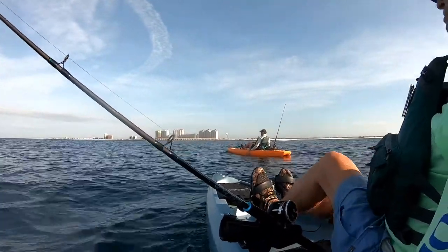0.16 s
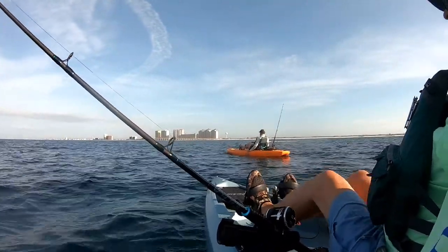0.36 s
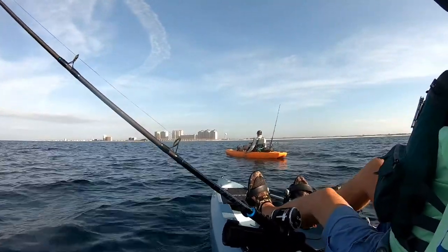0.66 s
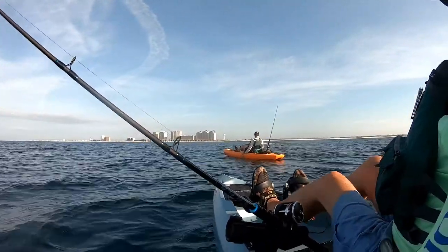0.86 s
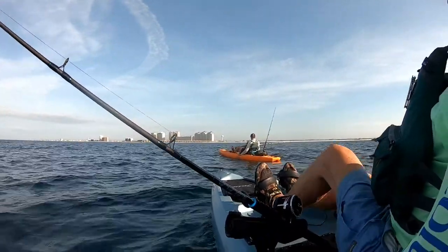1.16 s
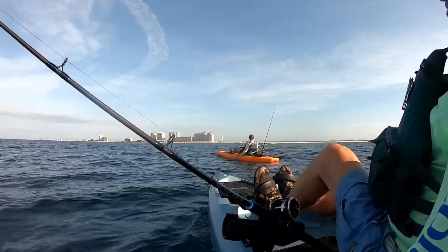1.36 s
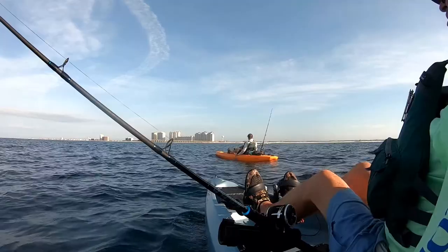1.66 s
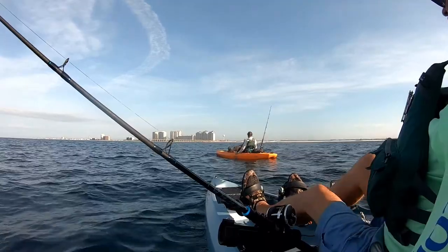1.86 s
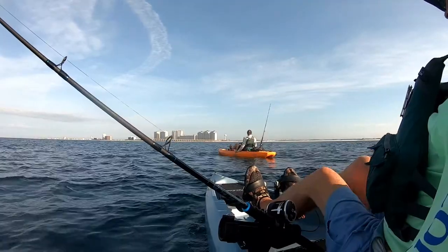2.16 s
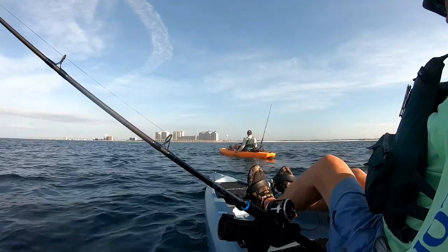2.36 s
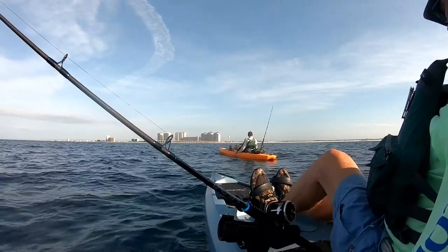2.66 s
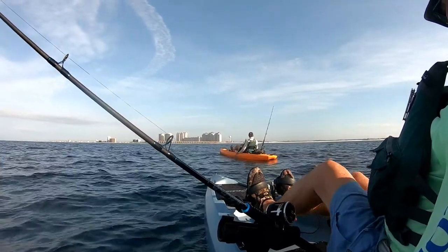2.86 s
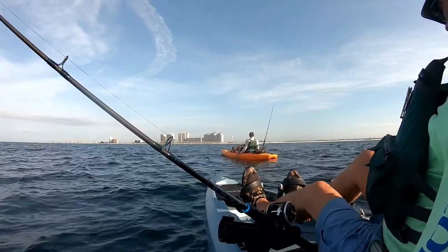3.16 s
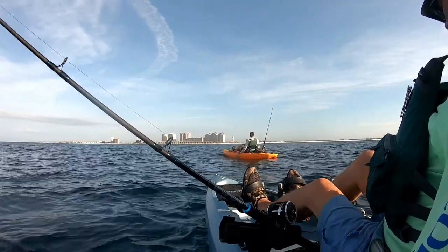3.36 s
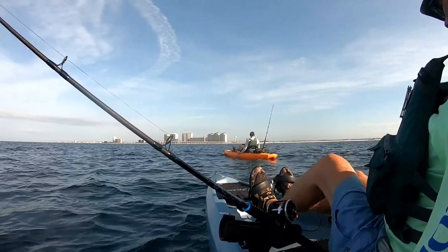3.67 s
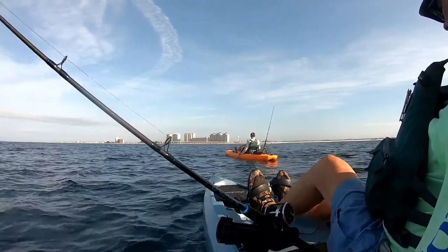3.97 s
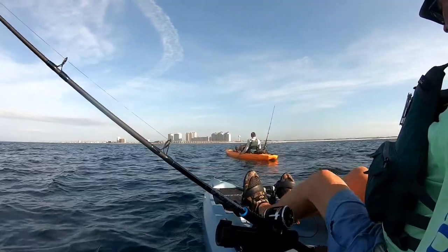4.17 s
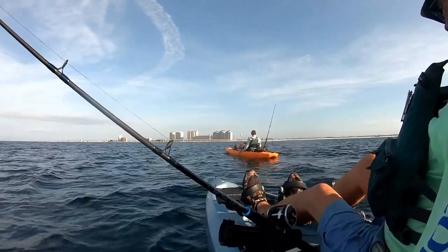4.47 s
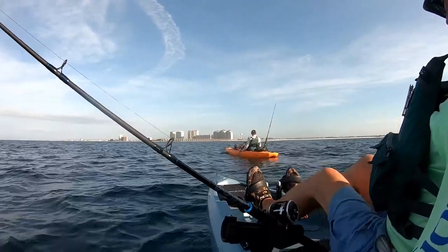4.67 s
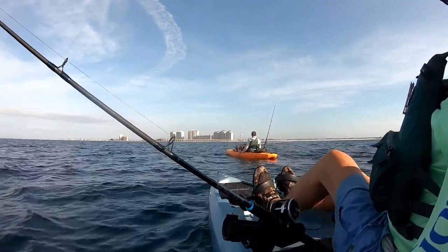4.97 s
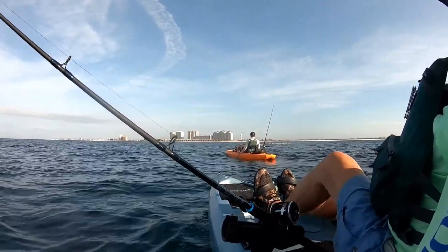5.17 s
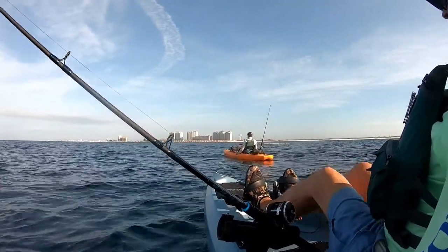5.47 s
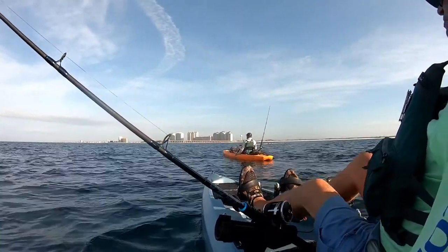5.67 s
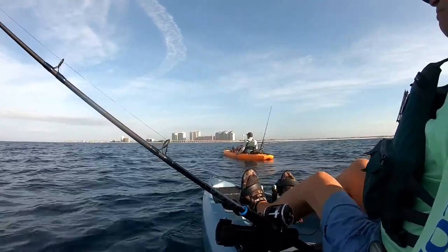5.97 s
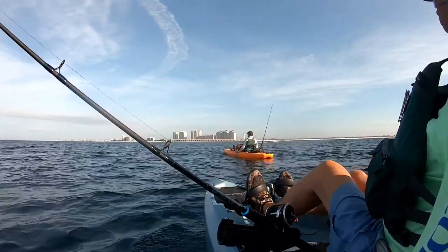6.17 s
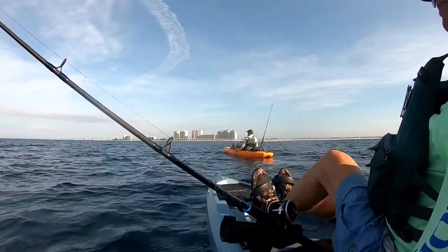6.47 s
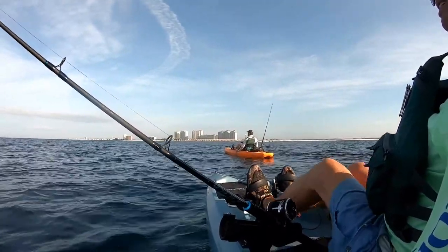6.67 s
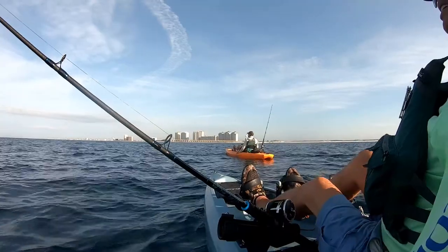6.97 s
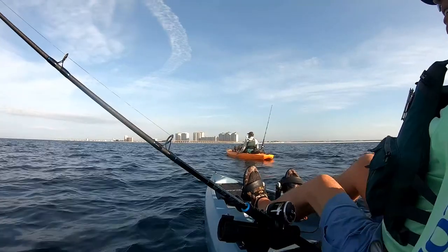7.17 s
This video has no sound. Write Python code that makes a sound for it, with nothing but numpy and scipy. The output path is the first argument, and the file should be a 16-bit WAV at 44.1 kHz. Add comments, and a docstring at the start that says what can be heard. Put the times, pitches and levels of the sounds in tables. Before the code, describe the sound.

Light chop washes along a plastic kayak on open water, heard close up from on board. A low hull drone, a breeze on the microphone and the faint, wavering hum of distant boat motors run throughout. It opens with a soft surge and a hiss of foam. Deep, loud wind thumps hit the microphone just before 1 second and again at 1.6, with a short gust near 1.9. From about 1 second, bubbles plop and water gurgles in uneven clusters. A wavelet gives a strong hollow slap on the hull at about 1.8 seconds. More knocks follow between 3.3 and 3.7, with light splashing and fizz, then at 4.1 and 4.9. Bubbly wash is busy from 4.5 to 5.3 seconds. After that come gentler surges and plops around 6.1 and 6.9, while the distant motor hum grows slightly towards the end, just past 7 seconds.

```python
"""A plastic kayak pedalled over a light chop. From the start, wind buffets the microphone over the drone
of the hull, far boat motors and open water; wash surges along the side, throwing spray, and foam hisses
away. Just before one second, single bubbles begin to plop at their resonances and a few eddies thump on
the microphone ports. From about one second to five, wavelets slap the hull, ringing its modes and the
air pockets they trap. Surges, foam and plops go on to the end, where more motor tones come in."""
import sys
import numpy as np
from scipy import signal
from scipy.fft import rfft, irfft
from scipy.io import wavfile

SR = 44100
rng = np.random.default_rng(int(sys.argv[2]) if len(sys.argv) > 2 else 0)


def bounce(signal):
    """Save signal as a 16-bit WAV file at the path given by the first command-line argument."""
    frames = np.transpose(np.atleast_2d(signal))
    limited = np.clip(frames, -1, 1)
    pcm = np.round(limited * 32767).astype(np.int16)
    wavfile.write(sys.argv[1], SR, pcm)


N = 323385
TIME_S = np.arange(N) / SR
BIN_HZ = np.arange(1, N // 2 + 2) * SR / N   # one bin up, so the logarithm is finite


def from_db(db):
    """The decibel law: amplitude grows tenfold every 20 dB."""
    return 10 ** (np.asarray(db) / 20)


def unit_rms(x):
    """Normalisation to unit mean power."""
    return x / np.sqrt(np.mean(x ** 2) + 1e-20)


def per_bin(curve):
    """Interpolation of a curve to every bin along a log-frequency axis."""
    hz, values = np.transpose(curve)
    return np.interp(np.log(BIN_HZ), np.log(hz + 1), values)


def drift(rate_hz):
    """Slow random modulation: low-passed noise of unit rms."""
    step = 40
    pole = np.exp(-2 * np.pi * step * rate_hz / SR)
    slow = signal.lfilter([1], [1, -2 * pole, pole ** 2], rng.standard_normal(N // step + 2002))[2000:]
    return np.interp(np.arange(N) / step, np.arange(len(slow)), unit_rms(slow))


def coloured(x, spectrum):
    """Spectral shaping to unit rms, silent beyond the ends of the spectrum."""
    inside = (BIN_HZ > spectrum[0][0]) & (BIN_HZ < spectrum[-1][0])
    return unit_rms(irfft(rfft(x) * from_db(per_bin(spectrum)) * inside, N))


def diffuse(spectrum, flicker_db, rate_hz, coherence=None):
    """A diffuse field: noise partly coherent at the two ports, its octaves flickering partly together."""
    # Likeness of ambient sound at the two ports: frequency_hz, coherence
    ambient_coherence = [(25, 0.14), (60, 1), (125, 1), (250, 1), (500, 0.71), (1000, 0.023), (2000, 0.06),
                         (4000, 0.63), (8000, 0.029), (13000, 0.58)]
    if coherence is None:
        coherence = per_bin(ambient_coherence)
    out, together = 0, drift(rate_hz / 4)
    mid, side = rfft(rng.standard_normal((2, N)))
    pair = np.sqrt(1 + coherence) * mid + np.sqrt(1 - coherence) * side * [[1], [-1]]
    first, last = np.log2([spectrum[0][0], spectrum[-1][0]])
    for octave in np.arange(np.floor(first), last + 1):
        window = np.cos(np.pi / 2 * np.clip(np.log2(BIN_HZ) - octave, -1, 1))
        out = out + irfft(pair * window, N) * from_db(flicker_db * (.9 * together + drift(rate_hz)))
    return coloured(out, spectrum)


def panned(x, pan_db):
    """Direction by level difference: left exceeds right by pan_db."""
    return x * from_db([[pan_db / 2], [-pan_db / 2]])


def add(out, start_s, sound):
    """Superposition of a short sound on a stereo signal."""
    at = round(start_s * SR)
    out[:, at:at + sound.shape[-1]] += sound[..., :max(N - at, 0)]


def swells(crests_s, peaks_db, holds_s, bed_db, rise_db_per_s, fall_db_per_s):
    """Incoherent powers add: the level in dB of a steady bed plus swells that climb, hold and fall."""
    power = np.full(N, from_db(2 * bed_db))
    for crest_s, peak_db, hold_s in zip(crests_s, peaks_db, holds_s):
        before_s = np.maximum(crest_s - TIME_S, 0)
        after_s = np.maximum(TIME_S - crest_s - hold_s, 0)
        power += from_db(2 * (peak_db - rise_db_per_s * before_s - fall_db_per_s * after_s))
    return 10 * np.log10(power)


def crossover(x, low_db, high_db, split_hz):
    """A crossover with a level for each band; the minus sign keeps them in phase where they meet."""
    low, high = (signal.sosfilt(signal.butter(2, split_hz, kind, fs=SR, output="sos"), x)
                 for kind in ("low", "high"))
    return from_db(low_db) * unit_rms(low) - from_db(high_db) * unit_rms(high)


def ring(clicks, hz, t60_s):
    """A damped resonator: a unit impulse starts a decaying sine of height 1."""
    radius, angle = from_db(-60 / (t60_s * SR)), 2 * np.pi * hz / SR
    return signal.lfilter([0, np.sin(angle)], [1, -2 * radius * np.cos(angle), radius ** 2], clicks + 1e-18)


def swarm(per_s, spread_db, pitches_hz, cycles):
    """A Poisson process: impulses of uneven size, each dealt to one of a bank of resonators."""
    sizes = from_db(spread_db * np.minimum(rng.exponential(1, N), 4))
    signs = rng.choice([-1, 1], N)
    clicks = sizes * signs / np.sqrt(per_s) * (rng.random(N) < per_s / SR)
    dealt, pans_db = rng.integers(0, len(pitches_hz), N), rng.normal(0, 3, len(pitches_hz))
    out = np.zeros((2, N))
    for k, hz in enumerate(pitches_hz):
        ringing = ring(clicks * (dealt == k), hz, cycles / hz)
        rounded = ring(ringing, hz, .4 * cycles / hz)   # a wider resonance softens each onset
        out += panned(rounded * hz ** 1.5, pans_db[k])
    return out


def damped_sine(hz, cycles, glide, onset_cycles=2.6):
    """A free oscillation that swells and decays 60 dB over `cycles`, its pitch climbing by 2 * glide."""
    turns = np.arange(int(cycles / hz * SR) + 8) / SR * hz
    phase = 2 * np.pi * turns * (1 + glide * turns / cycles)
    onset = (1 - np.exp(-turns / onset_cycles)) ** 2
    return np.sin(phase) * from_db(-60 * turns / cycles) * onset


def burst(low_hz, high_hz, t60_s):
    """A noise transient: one band with a rounded onset and exponential decay, mostly alike at both ports."""
    t = np.arange(int(t60_s * SR)) / SR
    band = signal.butter(3, [low_hz, min(high_hz, .45 * SR)], "band", fs=SR, output="sos")
    envelope = from_db(-60 * t / t60_s) * (1 - np.exp(-t / (.14 * t60_s)))
    noise = rng.standard_normal((2, len(t))) * [[1], [.45]]
    mid, side = unit_rms(signal.sosfilt(band, noise)) * envelope
    return np.array([mid + side, mid - side])


def wind():
    """Turbulent pressure on the ports: a steady breeze with short gusts and deep lumps."""
    # Spectrum of the buffeting: frequency_hz, density_db
    spectrum = [(11, -14.5), (18, -11), (70, 3.5), (123, -4), (145, -2.5), (220, -11.5), (260, -10),
                (340, -25), (570, -120)]
    # Gusts: crest_s, buffet_db, lump_db
    gusts = [(0.0, -41, -57), (0.861, -36, -34.5), (1.22, -47, -35), (1.92, -32, -51), (2.78, -46, -42.5),
             (3.02, -41, -39.5), (4.02, -60, -60), (6.98, -45, -45)]
    crests_s, buffet_peaks_db, lump_peaks_db = np.transpose(gusts)
    shape = dict(holds_s=np.zeros(len(gusts)), rise_db_per_s=98, fall_db_per_s=119)
    buffet_db = swells(crests_s, buffet_peaks_db, bed_db=-47, **shape)
    lump_db = swells(crests_s, lump_peaks_db, bed_db=-64, **shape)
    air = diffuse(spectrum, flicker_db=2.5, rate_hz=11.6, coherence=.35)
    return crossover(air, lump_db, buffet_db, split_hz=45)


def hull_drone():
    """The hull drones: low-frequency noise under slow amplitude modulation."""
    # Spectrum of the drone: frequency_hz, density_db
    spectrum = [(53, 0), (90, 3.5), (134, -1), (195, -10), (268, -9), (318, -16.5), (440, -23.5),
                (700, -34), (910, -50), (1540, -120)]
    return from_db(-44.5) * diffuse(spectrum, flicker_db=1.0, rate_hz=2.4)


def far_motors():
    """Propagation fading: each motor tone wavers as the air path shifts, and passes in and out of reach."""
    # Motor tones, one track each: time_s, pitch_hz, level_db
    tracks = [
        [(0, 65, -51.5), (2.5, 64.6, -48.5), (5, 62.6, -45.5), (6.5, 65, -50), (7.33, 62.7, -40.5)],
        [(.6, 118, -61.5), (2.7, 118.2, -49.5), (3.8, 121, -43.5), (5.2, 120.6, -43), (5.45, 115.3, -46.5),
         (7.33, 113.2, -50.5)],
        [(0, 253.6, -54), (2.5, 256.9, -58), (4.5, 263.5, -55), (5.6, 264.2, -62.5), (6.3, 264.5, -57),
         (7.33, 267, -53.5)],
        [(.4, 276.3, -71.5), (3.6, 284.3, -54.5)],
        [(5.0, 220.8, -50.5), (6.7, 227.1, -81)],
        [(5.9, 186.8, -51.5), (6.6, 191.2, -53), (7.33, 197.3, -41)],
        [(6.0, 141.4, -53), (6.6, 157.8, -49.5), (7.33, 175.8, -55)],
    ]
    out, fade_s = np.zeros(N), 0.17
    for track in tracks:
        times_s, *columns = np.transpose(track)
        hz, level_db = (np.interp(TIME_S, times_s, column) for column in columns)
        inside_s = np.minimum(TIME_S - times_s[0] + 0.086, times_s[-1] + 0.013 - TIME_S)
        reach = np.clip(inside_s / fade_s, 0, 1)
        turns = np.cumsum(hz) / SR + rng.random() + 0.07 * drift(4.0)
        out += np.sqrt(2) * np.sin(2 * np.pi * turns) * from_db(level_db + 3.0 * drift(6.0)) * reach
    return out


def open_water():
    """Far-off water arrives as a nearly stationary diffuse field."""
    # Spectrum of distant water: frequency_hz, density_db
    spectrum = [(180, -43.5), (300, -0.5), (325, -5.5), (528, -12), (777, -14.5), (943, -18), (1280, -21.5),
                (2830, -51), (6860, -38.5), (10600, -52), (14200, -62.5)]
    return from_db(-60.5) * diffuse(spectrum, flicker_db=-0.27, rate_hz=2.9)


def surges():
    """Envelopes in dB of the low gurgle and the high crackle as water surges along the side."""
    # Surges of wash: crest_s, hold_s, gurgle_db, crackle_db
    crests = [(0.0, 0.014, -67, -64), (0.736, 0.31, -66, -92.5), (1.3, 0.11, -60.5, -61.5),
              (1.572, 0.21, -60.5, -67), (2.8, 0.053, -69.5, -74.5), (3.403, 0.33, -80, -77),
              (4.07, 0.052, -72.5, -89), (4.57, 0.049, -55.5, -62), (4.905, 0.048, -59, -68.5),
              (5.227, 0.034, -69, -70.5), (6.114, 0.14, -64.5, -66.5), (6.92, 0.035, -69, -76.5)]
    crests_s, holds_s, gurgle_peaks_db, crackle_peaks_db = np.transpose(crests)
    shape = dict(holds_s=holds_s, rise_db_per_s=71.5, fall_db_per_s=71.5)
    return (swells(crests_s, gurgle_peaks_db, bed_db=-70.5, **shape),
            swells(crests_s, crackle_peaks_db, bed_db=-87, **shape))


def wash(gurgle_db, crackle_db):
    """Clumps of bubbles resonate over a rush of water; stronger wash has more, and louder droplets."""
    # Spectrum of the wash: frequency_hz, density_db
    wash_spectrum = [(180, -36), (300, -25), (384, -10), (703, -10.5), (938, -11.5), (1340, -9),
                     (2700, -11.5), (3600, -12.5), (4880, -17), (8000, -53), (10400, -70), (17600, -120)]
    # Spectrum of fine droplets: frequency_hz, density_db
    spatter_spectrum = [(2400, -11), (3500, 9), (7000, 3), (13500, -14)]
    bubbles_per_s = 2200 * from_db(0.2 * (gurgle_db + 64.5) + 2.5 * drift(15.0))
    bubbles = swarm(bubbles_per_s, spread_db=3.7, pitches_hz=np.geomspace(450, 6500, 28), cycles=16)
    rush = diffuse(wash_spectrum, flicker_db=1.5, rate_hz=12.0)
    bubbly = np.clip(.8 + .005 * (crackle_db + 65), .1, .95)   # weight in an equal-power mix
    water = bubbly * coloured(bubbles, wash_spectrum) + np.sqrt(1 - bubbly ** 2) * rush
    drops_per_s = 60 * from_db(3.1 * drift(5.1))
    drops = swarm(drops_per_s, spread_db=3.0, pitches_hz=np.geomspace(3000, 12000, 8), cycles=22)
    spatter = from_db(.5 * crackle_db - 46) * coloured(drops, spatter_spectrum)
    slosh_db = 1.5 * drift(8.0)
    return crossover(water, gurgle_db + .5 * slosh_db, crackle_db + slosh_db, split_hz=1830) + spatter


def spray(crackle_db):
    """Droplets ring high and briefly in a mist of noise, whose envelope partly follows the wash."""
    # Spectrum of wind-blown spray: frequency_hz, density_db
    spectrum = [(3800, -25.5), (5500, 2), (10300, 0.5), (14300, -26)]
    drops = swarm(per_s=110, spread_db=3.2, pitches_hz=np.geomspace(6000, 12500, 6), cycles=13)
    mist = diffuse(spectrum, flicker_db=2.0, rate_hz=10.0)
    level_db = -77.5 + 0.29 * (crackle_db + 75.5)
    return from_db(level_db) * (0.62 * coloured(drops, spectrum) + 0.66 * mist)


def foam():
    """Exponential decay in stages: each patch rushes, lingers as a fainter fizz, then dies quickly."""
    # Patches of foam: crest_s, peak_db, hold_s, life_s
    patches = [(0.0, -55.5, 0.048, 0.79), (3.311, -60.5, 0.12, 0.68), (4.588, -63.5, 0.041, 0.12),
               (5.43, -75.5, 0.029, 0.073), (6.217, -62.5, 0.022, 0.23)]
    # Spectrum of the hiss: frequency_hz, density_db
    spectrum = [(3500, -19), (4400, -9), (5000, 0), (5700, -5), (6700, 0), (7500, -2), (8000, -10),
                (8400, -7), (9200, -14), (10100, -6), (11200, -17), (14400, -26)]
    linger_db, sag_db_per_s, spent_db_per_s = -11.5, 5, 84
    crests_s, peaks_db, holds_s, _ = np.transpose(patches)
    rush_db = swells(crests_s, peaks_db, holds_s, bed_db=-92.5, rise_db_per_s=250, fall_db_per_s=67)
    power = from_db(2 * rush_db)
    for crest_s, peak_db, _, life_s in patches:
        age_s = TIME_S - crest_s
        decay_db = sag_db_per_s * age_s + spent_db_per_s * np.maximum(age_s - life_s, 0)
        power += (age_s > 0) * from_db(2 * (peak_db + linger_db - decay_db))
    return np.sqrt(power) * panned(diffuse(spectrum, flicker_db=1.1, rate_hz=24.0), pan_db=2.5)


def bubble_cluster(hz):
    """Bubble resonance, rising in pitch near the surface: one bubble, three fainter ones and a spatter."""
    out, khz = np.zeros((2, SR // 5)), hz / 1000
    cycles = 38.5 - 0.87 * np.log2(khz)
    glide = 0.23 / khz   # big, low bubbles climb more
    detune_octaves, lag_s = 0.08 * khz, 0.007 / khz   # small ones cluster wider in pitch, closer in time
    add(out, 0, damped_sine(hz, cycles, glide))
    for detune, lag, side in rng.random((3, 3)):
        neighbour = damped_sine(hz * 2 ** (detune_octaves * (detune - .4)), cycles, glide)
        add(out, lag_s * lag, from_db(-8) * panned(neighbour, 4 * side - 2))
    add(out, 0, from_db(-3) * burst(.82 * hz, 1.22 * hz, t60_s=1.8 * cycles / hz))
    return out


def plops():
    """Resonating bubbles loud enough to be heard one by one."""
    # Single plops: start_s, level_db, pitch_hz, pan_db
    bubbles = [(0.7071, -50.5, 2510, -14), (1.009, -46, 2275, -1), (1.165, -41, 928, -3),
               (1.164, -40, 2680, -1), (1.221, -48, 720, 1), (1.277, -35, 669, 1), (1.321, -45, 704, 1),
               (1.387, -42, 1080, 0), (1.203, -49, 3120, 0), (1.2936, -59, 3020, 2), (1.344, -47, 3830, 2),
               (1.416, -30, 3210, 1), (1.428, -37.5, 1650, 4), (1.497, -47, 1400, 7), (1.551, -42, 3370, 0),
               (1.5876, -47, 3560, 0), (1.591, -46, 770, -6), (1.651, -47, 1260, 4), (1.7363, -38, 2810, 2),
               (1.737, -32, 910, -2), (1.709, -46, 2600, 1), (1.752, -48, 3450, 2), (1.881, -43, 1077, 3),
               (2.274, -47, 3600, 2), (2.273, -46.5, 1290, -2), (2.378, -40.5, 1500, -4),
               (2.588, -44.5, 1177, -1), (2.8604, -45, 3450, 0), (2.978, -49.5, 1014, 17),
               (3.2544, -49, 3060, 2), (3.397, -27.5, 958, -7), (3.6523, -45.5, 2950, 2),
               (3.676, -37, 1130, -6), (4.101, -48, 3010, -3), (4.108, -38.5, 752, -1),
               (4.1507, -54.5, 3300, -3), (4.2667, -50.5, 3100, 1), (4.377, -44, 1084, -4),
               (4.446, -46.5, 2480, -9), (4.524, -32.5, 1173, 0), (4.549, -43, 2900, 0),
               (4.566, -37, 2020, 0), (4.589, -37, 2700, -2), (4.611, -55, 1900, 0),
               (4.631, -40.5, 1000, 2), (4.655, -48, 1520, 0), (4.781, -41, 3610, 0), (4.794, -52, 870, -8),
               (4.8269, -45, 3500, 0), (4.8713, -44.5, 3100, -1), (4.911, -38, 2540, -2),
               (4.932, -31, 2560, 0), (4.9508, -40.5, 2760, 0), (4.96, -44, 1110, 2),
               (5.16, -48.5, 1060, -2), (5.1841, -44.5, 2170, 3), (5.213, -47, 2470, 0),
               (5.2589, -43.5, 2300, 0), (5.2788, -41.5, 3100, 0), (5.281, -38.5, 1205, 2),
               (5.943, -47, 1360, 3), (5.872, -52, 4190, 0), (5.9051, -53, 2822, 2), (6.0223, -54, 3820, 0),
               (6.0767, -44, 2480, 1), (6.0767, -48, 3500, 1), (6.095, -49, 2700, 0), (6.132, -45, 1870, 2),
               (6.167, -35.5, 1270, -2), (6.175, -40, 1850, 0), (6.184, -45, 3500, 1),
               (6.3846, -48.5, 3670, 2), (6.497, -45.5, 1255, 3), (6.796, -51, 3787, -3),
               (6.873, -46.5, 3133, 0), (6.9193, -48.5, 2820, 1), (6.883, -44.5, 1126, 1),
               (6.924, -39.5, 1386, -2), (7, -49.5, 862, -5), (7.297, -44, 817, 3)]
    out = np.zeros((2, N))
    for start_s, level_db, hz, pan_db in bubbles:
        add(out, start_s - .001, from_db(level_db) * panned(bubble_cluster(hz), pan_db))
    return out


def eddy_thumps():
    """Each eddy gives a low, damped pressure oscillation, stronger on one port."""
    # Eddies bursting on the ports: start_s, level_db, pitch_hz, decay_cycles, pan_db
    eddies = [(0.836, -15.5, 75, 3.4, 19.5), (0.855, -18, 38, 6.3, 7), (0.898, -21, 100, 4.4, -18),
              (0.915, -21.5, 78, 7.5, 17), (1.115, -24.5, 45, 3.2, -14), (1.64, -18.5, 80, 7.1, -2)]
    out = np.zeros((2, N))
    for start_s, level_db, hz, cycles, pan_db in eddies:
        thump = damped_sine(hz, cycles, glide=0, onset_cycles=0.27)
        add(out, start_s - .004, from_db(level_db) * panned(thump, pan_db))
    return out


def droplet_ticks():
    """Droplets tick: transients this short have a broad, bright spectrum."""
    # Single droplets: start_s, level_db
    droplets = [(1.006, -53.5), (1.841, -51.5), (3.398, -44), (4.088, -53.5), (4.447, -56), (4.6538, -54),
                (5.28, -51), (1.398, -52), (1.636, -57), (5.6361, -59), (6.636, -56.5), (6.796, -57)]
    out = np.zeros((2, N))
    for start_s, level_db in droplets:
        add(out, start_s, from_db(level_db) * burst(4500, 11000, t60_s=.016))
    return out


def hull_slaps():
    """Impact excitation: a wavelet cracks, then trapped air and hull modes ring while the splash dies."""
    # Wavelets on the hull: start_s, level_db, pocket_hz, crack_db, splash_db, pocket_t60_s
    slaps = [(1.169, -38.5, 256, -39.5, -44, 0.094), (1.742, -29.5, 253, -36, -41, 0.04),
             (1.845, -15, 398, -37.5, -38, 0.039), (1.879, -31, 148, -72, -74, 0.15),
             (1.904, -48, 230, -52, -60.5, 0.08), (3.296, -22, 398, -38, -53, 0.12),
             (3.4, -23.5, 214, -30.5, -30, 0.12), (3.656, -17.5, 389, -45, -48, 0.043),
             (3.679, -27.5, 292, -51, -59, 0.04), (3.69, -33, 349, -66, -67, 0.14),
             (4.101, -27, 222, -41, -49, 0.036), (4.931, -24, 426, -32, -40.5, 0.072)]
    # Modes of the plastic hull: pitch_hz, gain_db, t60_s
    modes = [(168.3, -11, 0.44), (238.4, 4, 0.064), (349, 2.5, 0.073), (408, -1.5, 0.065),
             (477, -3.5, 0.17), (575, 0, 0.061), (650, -6.5, 0.073), (762, 0, 0.072), (1130, 7, 0.071)]
    starts_s, levels_db, *_ = np.transpose(slaps)
    at, hull = (starts_s * SR).astype(int), np.zeros((2, N))
    for hz, gain_db, t60_s in modes:
        strengths = from_db(levels_db + gain_db - 9 + rng.normal(0, 2, len(at)))
        impulses = np.zeros(N)
        impulses[at] = strengths * rng.choice([-1, 1], len(at))
        hull += ring(impulses, hz, t60_s)
    push = np.hanning(round(0.0017 * SR))   # water gives a soft push, which weakens the high modes
    out = signal.lfilter(push / push.sum(), [1], hull)
    for start_s, level_db, hz, crack_db, splash_db, t60_s in slaps:
        pocket = damped_sine(hz, cycles=t60_s * hz, glide=0.055, onset_cycles=0.45)
        add(out, start_s - .002, from_db(level_db - 2) * pocket)
        add(out, start_s - .002, from_db(crack_db) * burst(820, 3600, t60_s=0.013))
        add(out, start_s + .00205, from_db(splash_db) * burst(480, 1396, t60_s=0.093))
    return out


def scene():
    """Linear superposition of hull, water, wind and motors."""
    gurgle_db, crackle_db = surges()
    bed = hull_drone() + open_water()
    water = spray(crackle_db) + foam() + wash(gurgle_db, crackle_db)
    transients = hull_slaps() + plops() + droplet_ticks()
    return bed + water + transients + wind() + eddy_thumps() + far_motors()


def record(dry):
    """The microphone's transfer function: its ports differ in level and phase, and the top is cut."""
    # Level of the left port over the right: frequency_hz, difference_db
    balance = [(60, -3.5), (110, 1), (200, -1), (370, -0.5), (670, -4), (1230, -4), (2250, -3), (4110, -2),
               (7510, 0), (13700, -3.5)]
    # Phase of the left port ahead of the right: frequency_hz, lead_rad
    phase_lead = [(0, 0), (600, -.5), (1300, .5), (2200, -.1), (4000, .1), (6600, -1.3), (10300, -4.2),
                  (14000, -4)]
    cutoff_hz = 14800
    lead_rad = np.interp(BIN_HZ, *np.transpose(phase_lead))
    left = from_db(per_bin(balance) / 2) * np.exp(.5j * lead_rad)
    heard = irfft(rfft(dry) * [left, 1 / left], N)
    return signal.sosfilt(signal.cheby2(18, 60, cutoff_hz, fs=SR, output="sos"), heard)


dry = scene()
out = record(dry)
bounce(out)
```